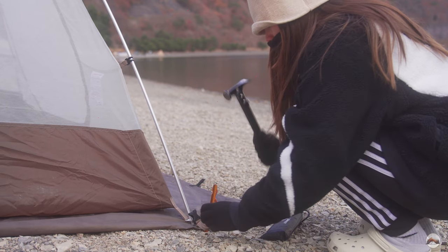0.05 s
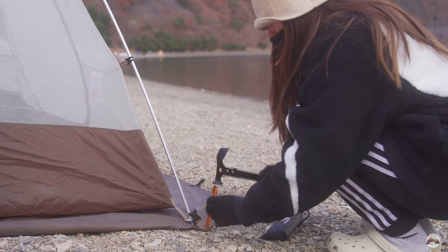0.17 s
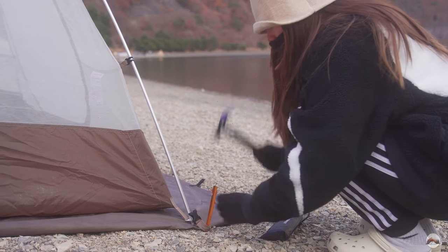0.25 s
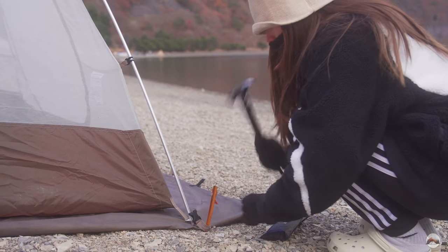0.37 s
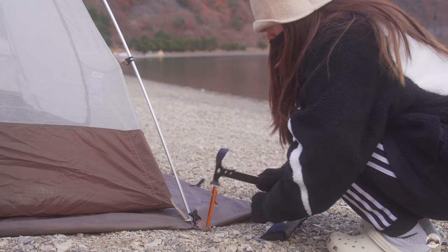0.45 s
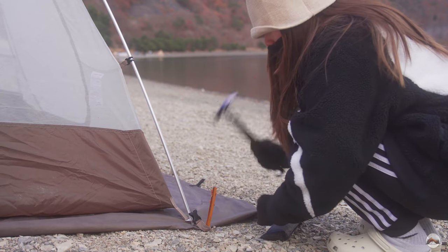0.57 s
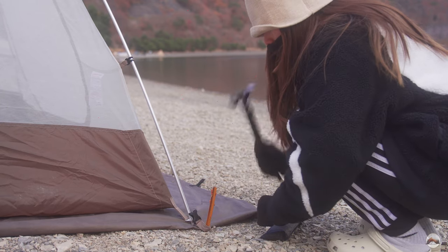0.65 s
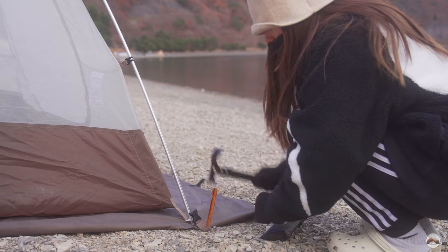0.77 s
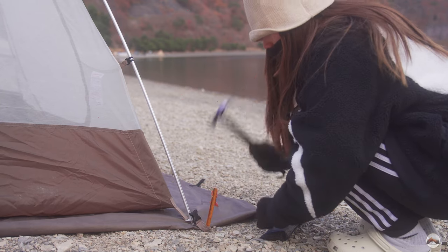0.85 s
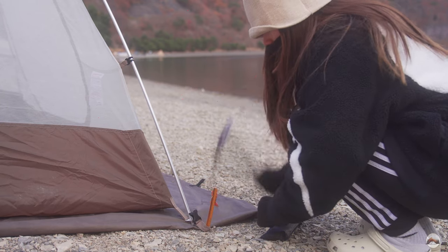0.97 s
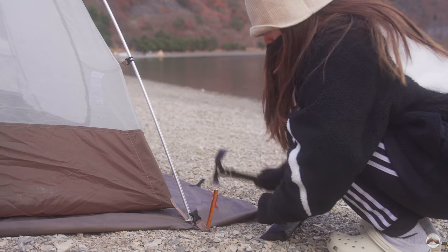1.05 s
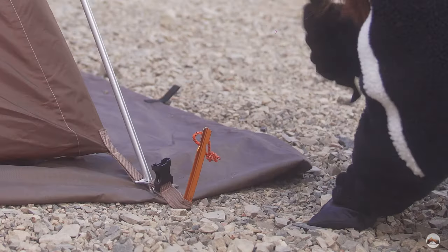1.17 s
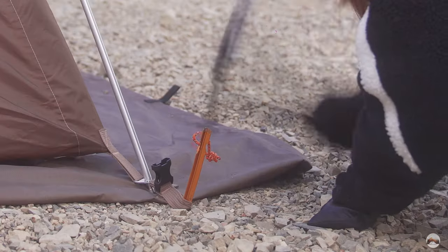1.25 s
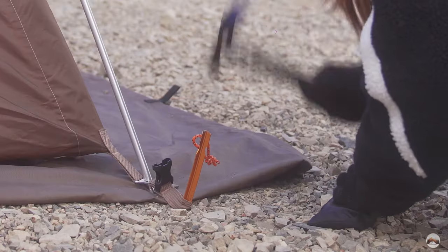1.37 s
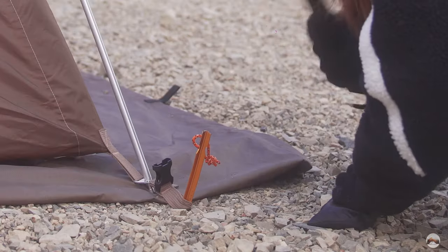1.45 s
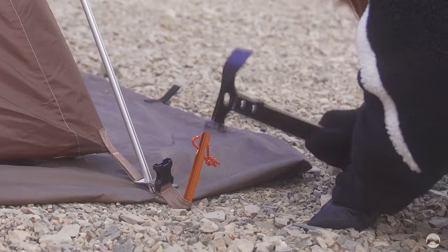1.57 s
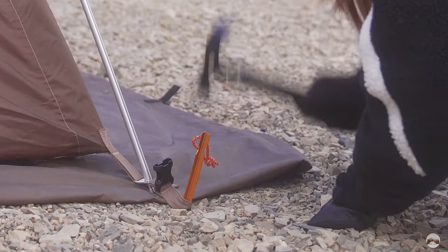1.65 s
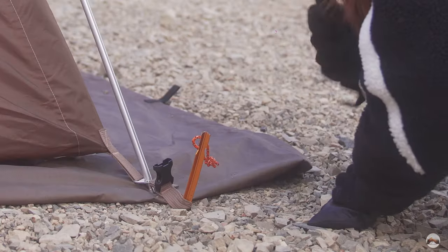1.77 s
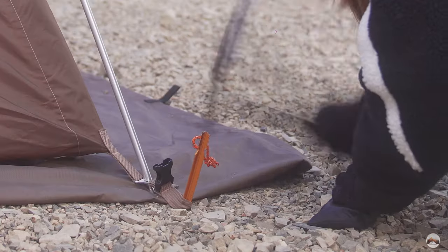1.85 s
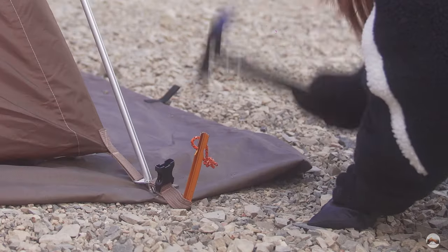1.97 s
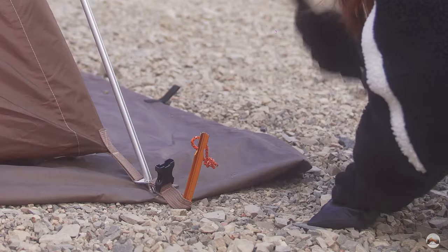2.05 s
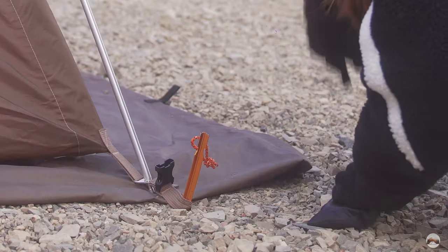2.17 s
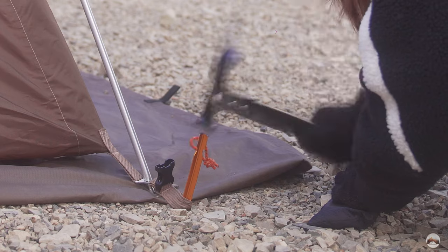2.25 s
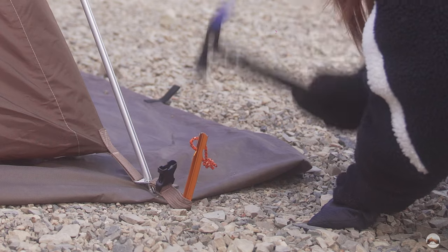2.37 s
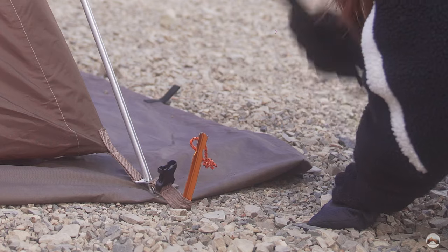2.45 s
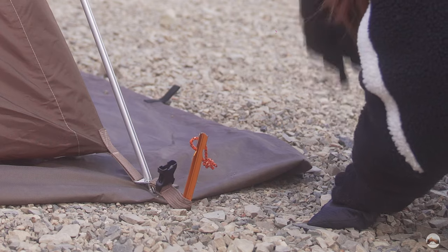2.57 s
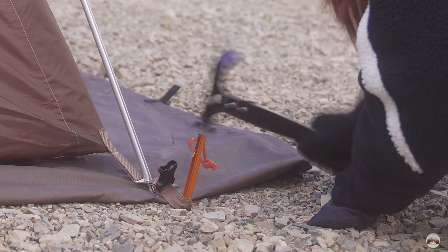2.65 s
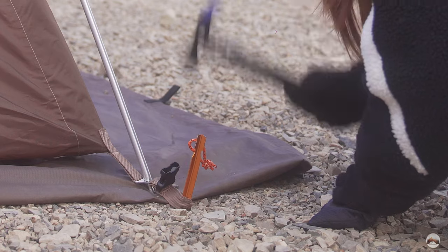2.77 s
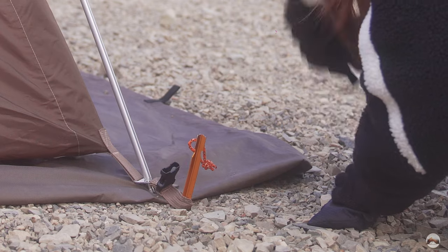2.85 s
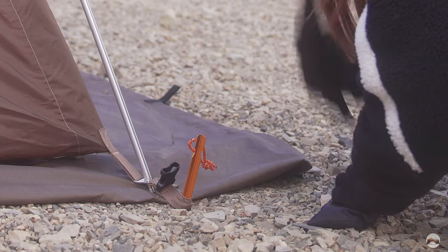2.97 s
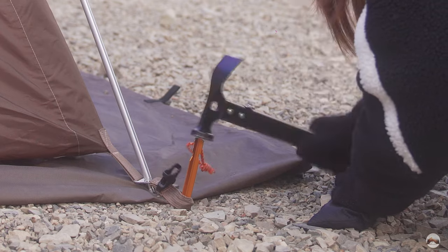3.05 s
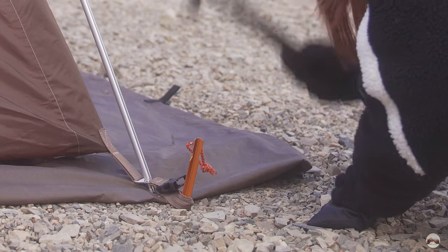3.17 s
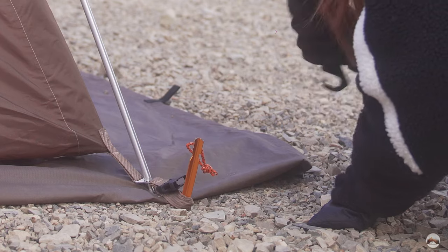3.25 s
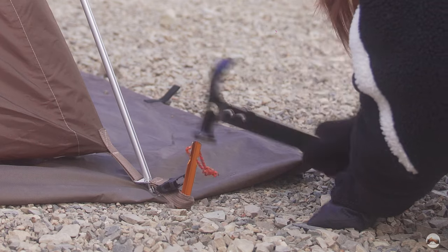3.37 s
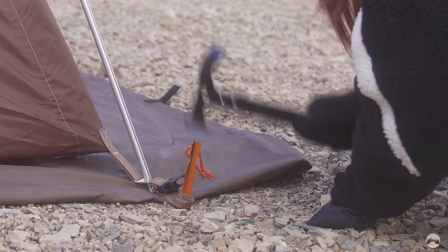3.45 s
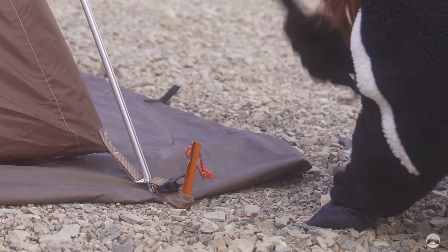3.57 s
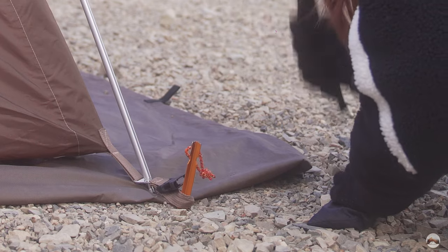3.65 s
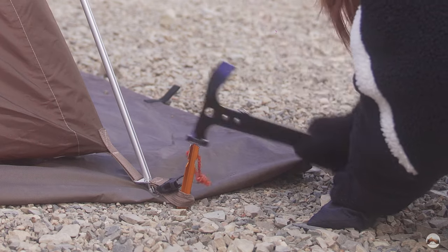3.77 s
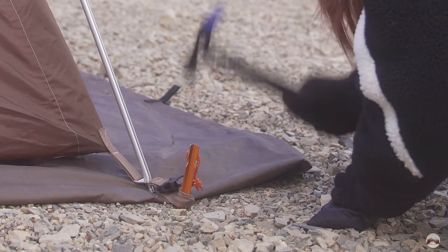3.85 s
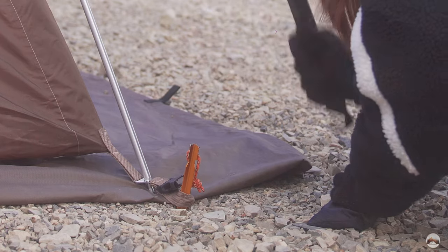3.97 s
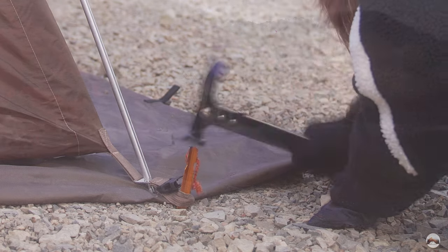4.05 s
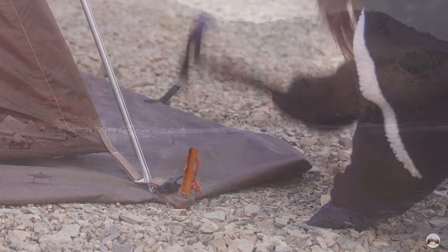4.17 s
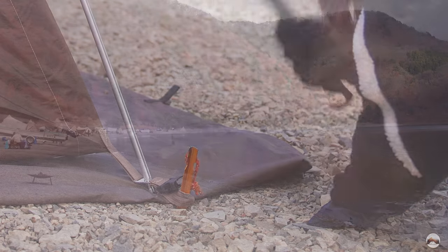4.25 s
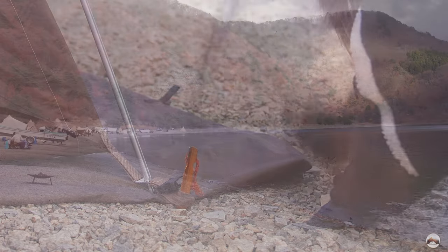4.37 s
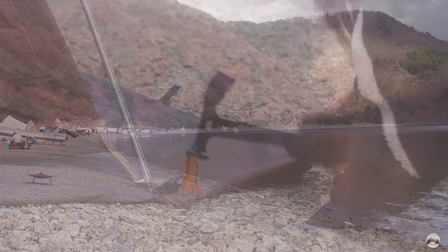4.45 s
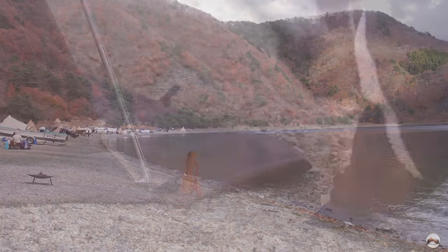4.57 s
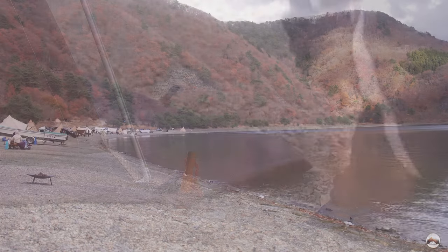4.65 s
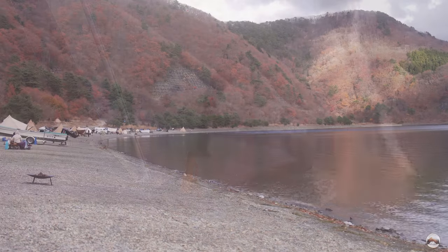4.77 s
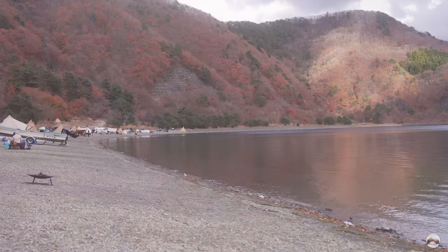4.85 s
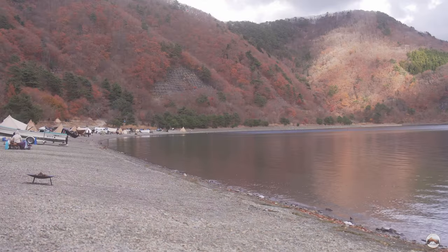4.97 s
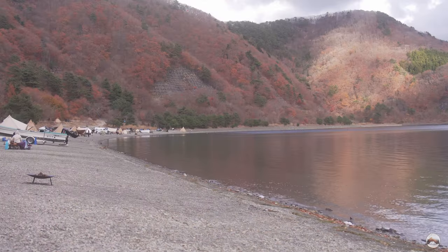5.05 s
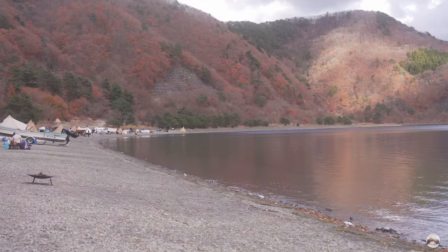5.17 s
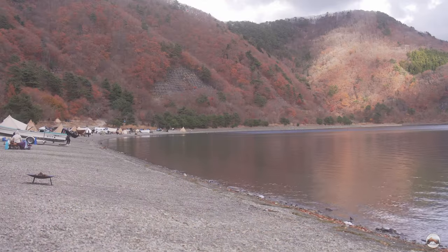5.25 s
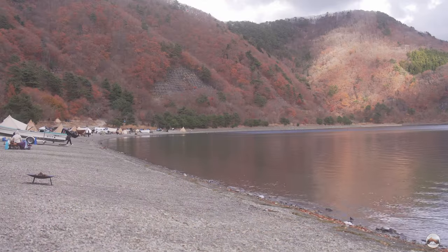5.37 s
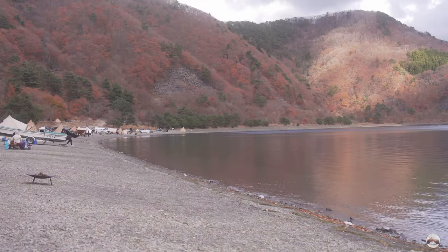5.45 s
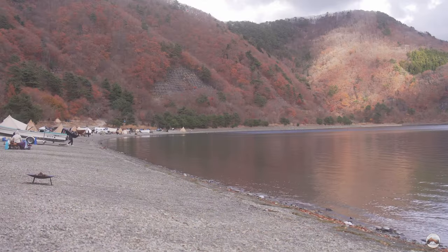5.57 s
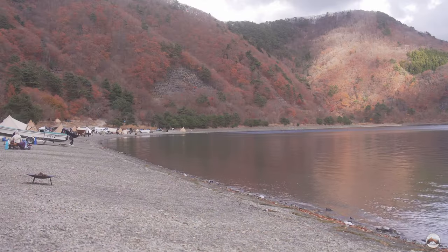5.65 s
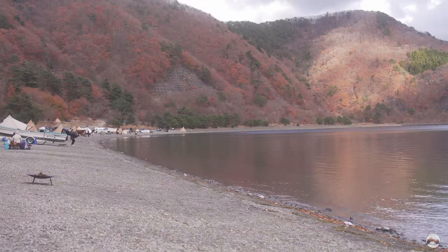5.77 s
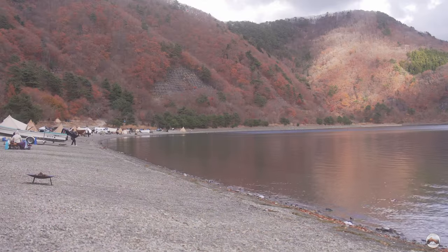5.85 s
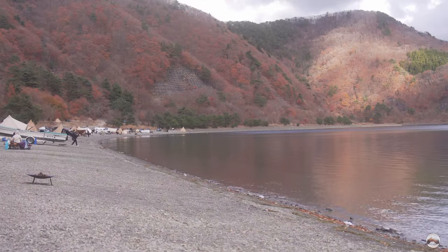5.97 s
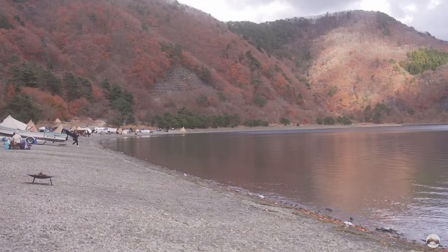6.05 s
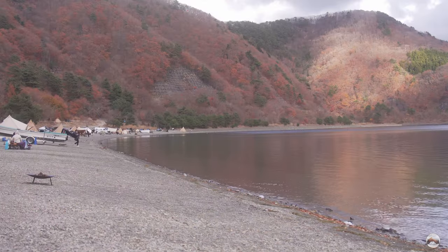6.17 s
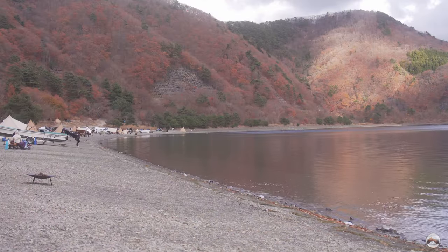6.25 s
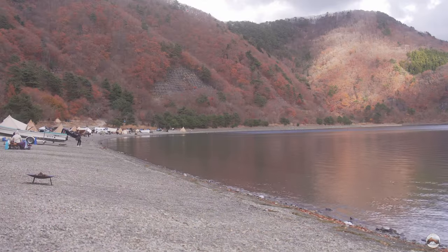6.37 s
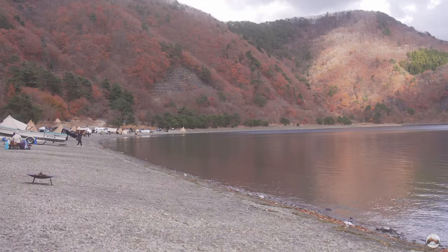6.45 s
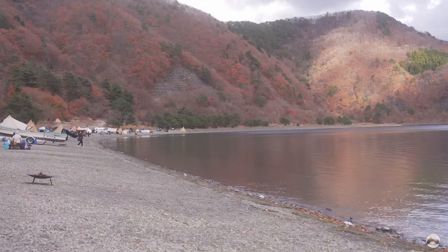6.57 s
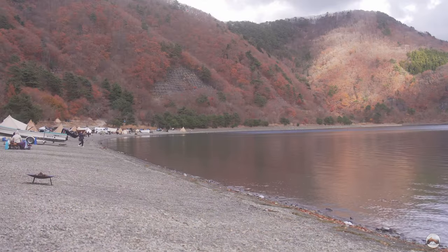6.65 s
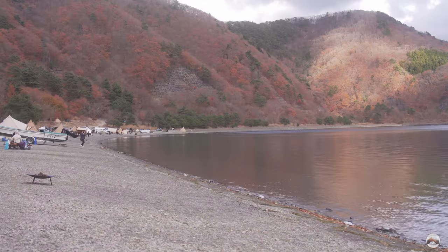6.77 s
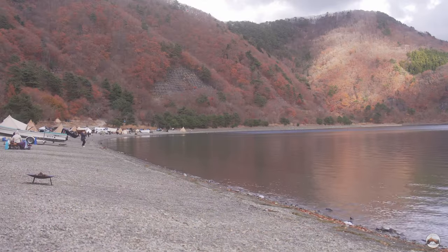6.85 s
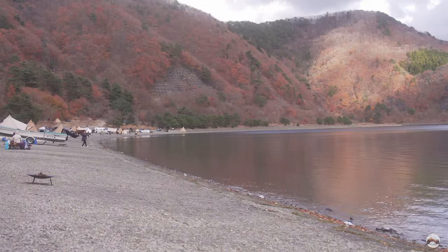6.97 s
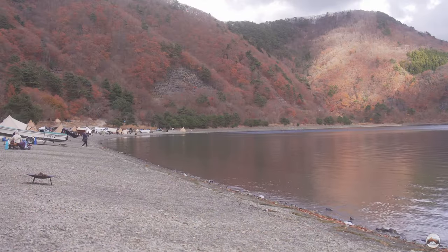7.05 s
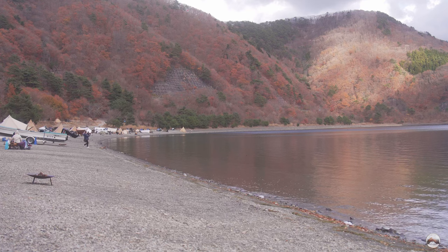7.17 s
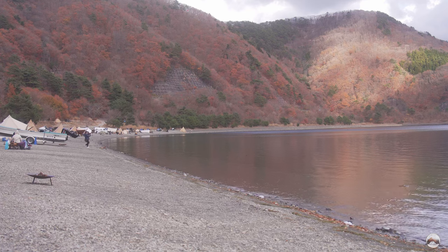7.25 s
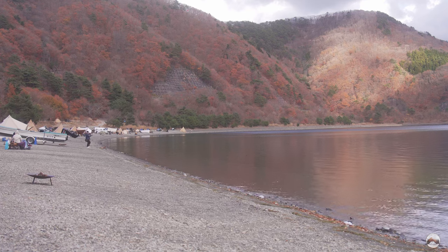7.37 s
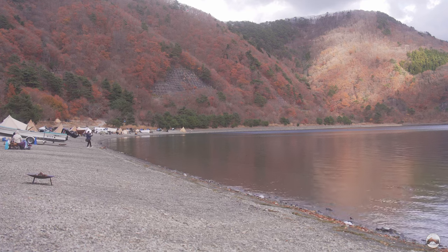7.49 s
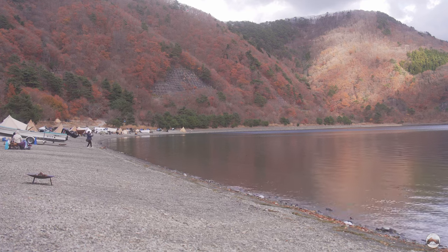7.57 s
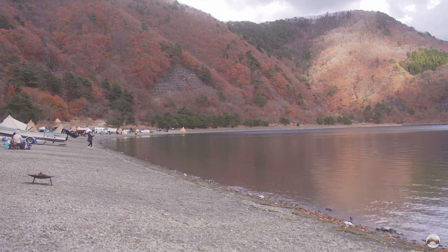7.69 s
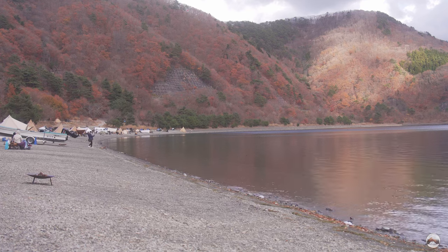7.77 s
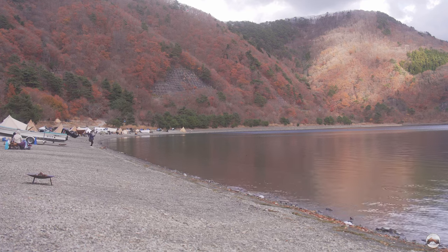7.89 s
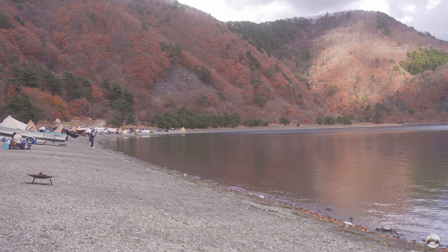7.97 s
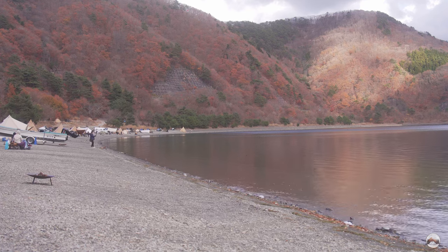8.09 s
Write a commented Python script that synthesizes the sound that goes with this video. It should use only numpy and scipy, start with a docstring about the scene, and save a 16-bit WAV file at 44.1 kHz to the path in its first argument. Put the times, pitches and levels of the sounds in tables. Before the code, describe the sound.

Close to the microphone, a small steel hammer drives a metal tent peg into gravel at about three blows a second, without pause. Each blow is a sharp bright clink, a short knock and stony crunch, then a tiny rebound tap and a thin high ring. Very quiet open lakeside air lies behind, with a faint far crow early, fabric rustle and pebble ticks midway.

```python
"""Lakeside gravel: a small steel hammer drives an alloy tent peg, about three blows a second.
Blows and bounces: shaped noise (crack, crunch), struck modes (clink, thud), peg and hammer notes.
Nearby surfaces answer with band-limited delays, the far shore with a tail of noise.
Behind: noise beds (open air, gusts of fabric rustle), pebble ticks, a far crow of gliding overtones,
far metal clinks of struck modes and a brief soft sine tone."""
import sys
import numpy as np
from scipy import signal
from scipy.fft import rfft, irfft, next_fast_len
from scipy.io import wavfile
from scipy.ndimage import uniform_filter1d

SR = 44100
rng = np.random.default_rng(int(sys.argv[2]) if len(sys.argv) > 2 else 0)


def magnitude_from_level(level_db):
    """Linear magnitude for a level in decibels (20 dB per decade)."""
    exponent = np.asarray(level_db, float) / 20
    return 10 ** exponent


def to_wav(sig):
    """Store sig (one row per channel, or 1-D mono) as 16-bit WAV at the path in sys.argv[1].

    Samples outside -1..1 are clipped; the rate is SR.
    """
    pcm = np.clip(np.atleast_2d(sig), -1, 1) * 32767
    pcm = np.round(pcm).astype(np.int16)
    wavfile.write(sys.argv[1], SR, pcm.T)  # frames by channels


N = 358091

# hammer blows: start_s, lower_clink_db, upper_clink_db, peg_note_db, hammer_note_db
BLOWS = [(-0.068, -10, -6, -15, -37.5), (0.2046, -6, -7, -24, -41.5), (0.5111, -5.5, -8, -18, -40.5),
         (0.7887, -4.5, -13, -16.5, -30.5), (1.0706, -2, -16, -16.5, -36), (1.3469, -5.5, -9.5, -20, -26),
         (1.6439, -9.5, -2, -8.5, -49.5), (1.947, -11.5, -6.5, -14.5, -30.5), (2.3379, -16, -5.5, -18, -32),
         (2.7351, -16, -3.5, -17.5, -46), (3.1063, -8.5, -5.5, -21.5, -29), (3.4503, -5, 0, -12, -26.5),
         (3.8084, -10, -9.5, -34, -39.5), (4.1373, -9, -10, -35, -36), (4.4744, -10, -0.5, -16, -25.5),
         (4.8218, -10.5, -4.5, -27.5, -32), (5.1655, -4, -2, -23.5, -28), (5.5112, -4.5, -2, -9.5, -29),
         (5.8462, -7, -3, -6, -26.5), (6.1679, -20, -3.5, -7, -23.5), (6.49, -17, -6, -11, -33.5),
         (6.8787, -7.5, -4.5, -4, -21), (7.2165, -10, -8.5, -15, -22.5), (7.536, -10.5, -14, -13.5, -27.5),
         (7.857, -14, -9, -15, -19.5)]
# head bouncing on the peg: start_s, clink_db, thud_db, next_touch_s (3 ms or less: none), note_left_db
BOUNCES = [(0.2358, -33.5, -22.5, 0, -46), (0.5519, -33.5, -24, 0.00029, -46),
           (0.817, -26, -25.5, 0.0066, -48.5), (1.1008, -28.5, -18.5, 0, -41),
           (1.3641, -21.5, -19.5, .0135, -49.5), (1.6703, -19, -21, 0.0081, -47),
           (1.9725, -21, -25.5, .0076, -60.5), (2.3699, -20, -25.5, .0071, -58),
           (2.7617, -18, -26.5, .0083, -66), (3.135, -25.5, -23.5, .0102, -46),
           (3.471, -21.5, -20, .0079, -61.5), (3.8347, -27.5, -23, .0099, -53),
           (4.158, -23, -19.5, .01, -56.5), (4.496, -25, -21.5, 0.0052, -50.5),
           (4.8415, -20, -19.5, 0.011, -45.5), (5.1829, -20.5, -18, 0, -39),
           (5.5367, -20, -19.5, .0103, -46.5), (5.8657, -22.5, -21, .0092, -57),
           (6.191, -26, -19, .0157, -36.5), (6.51, -21, -17.5, .0085, -43),
           (6.9066, -22.5, -17.5, .0092, -36), (7.2479, -25, -19, 0.0072, -37.5),
           (7.5656, -20, -17, .0105, -48.5), (7.8781, -29.5, -17, .0094, -49.5)]
# ground taking the blows as the peg sinks: time_s, deep_thump_db, knock_db, shank_note_db
GROUND = [(0.199, -30.5, -11.5, -27), (.8, -27, -11.5, -26.5), (1.35, -38, -14.5, -25.5),
          (1.65, -27, -14.5, -13), (2.0, -24.5, -13.5, -14), (2.4, -16, -16, -21),
          (3.1, -17.5, -18.5, -24.5), (3.5, -23, -18.5, -30), (3.902, -18, -20.5, -21),
          (4.499, -31.5, -17, -22), (5.198, -19.5, -19, -18.5), (6.2, -15.5, -19, -19),
          (6.5, -17.5, -22.5, -17), (7.859, -16.5, -16, -19)]
# modes of the struck metal: pitch_hz, level_db, t60_s
CLINK_MODES = [(3960, -15, 0.032), (4800, -11, 0.0067), (5070, -3.5, 0.013), (5240, -3, 0.039),
               (6190, -19.5, 0.06), (6980, 0, 0.015), (7663, -4, 0.021), (7930, 1.5, 0.01),
               (8450, 4, 0.018), (8480, -3, 0.014), (9512, -13, .06), (10850, -7, 0.013), (12100, -4, 0.01),
               (13400, -22.5, 0.031), (15300, -23, .01)]
# modes of ground and shank: pitch_hz, level_db, t60_s
THUD_MODES = [(165, -13, 0.062), (225.7, -2.5, 0.013), (353, 4, 0.018), (516, 4, 0.013), (644, -0.5, .022),
              (887, -0.5, 0.015), (1282, 2, 0.011), (1960, -5, .024), (2237, 5, 0.0084)]
# relative noise spectrum of metal on metal: freq_hz, density_db_per_hz
CRACK_SPECTRUM = [(1500, -21.5), (3000, -2.5), (5000, -3), (8000, 6), (10500, -11), (16000, -14.5),
                  (20000, -27)]
# relative noise spectrum of stones under a blow: freq_hz, density_db_per_hz
CRUNCH_SPECTRUM = [(100, -13), (200, 10), (1000, 0.5), (1600, -5.5), (3000, -1), (8000, -28),
                   (11000, -28.5), (16000, -24)]
# relative noise spectrum of stone on stone: freq_hz, density_db_per_hz
TICK_SPECTRUM = [(800, -11), (2500, 1.5), (4200, 1.5), (8000, 0), (11000, -8.5), (16000, -12)]
# near surfaces answering: delay_s, level_db, centre_hz, width_hz
ECHOES = [(0.013, -29.5, 6590, 4820), (0.049, -34, 6340, 4940)]
# pebbles shifting, and at 0.33 s a late return of the blow before it: start_s, level_db, low_part_db (re
# level_db)
PEBBLES = [(0.0832, -47, -5), (0.3267, -42.5, -20), (3.5191, -32.5, -32), (4.8867, -29.5, -10),
           (4.9169, -27, -12), (4.9545, -29, -6), (5.9511, -50, -6), (6.5465, -46, -9), (6.5877, -42, -13),
           (6.6012, -43.5, -20), (6.6846, -47, 11.5), (6.7244, -55, -4.5), (6.7578, -52, 11.5),
           (7.7697, -45.5, -11)]
# far crow: start_s, length_s, top_pitch_hz, level_db
CAWS = [(.05, .27, 434, -61), (.595, .235, 432, -60)]
# crow overtones: multiple, level_db
CAW_OVERTONES = [(1, -10), (2, -2), (3, 0), (4, -14)]
# brief soft tone: time_s, pitch_hz, level_db
SOFT_TONE = [(4.70, 545, -65), (4.73, 533, -47.5), (4.78, 540, -51), (4.81, 535, -76)]
# far metal, larger and smaller piece: strikes (start_s, level_db), modes (pitch_hz, level_db, t60_s)
FAR_CLINKS = [([(2.278, -60)], [(1437, -4, .3), (2110, -2, .2), (2702, 0, .3), (2982, -3, .2),
              (3600, -8, .2), (3750, -5, .3), (4600, -19, .3)]), ([(2.092, -66), (1.53, -65)],
              [(2900, 0, .12), (4350, -13, .25)])]
# gusts of fabric rustle: time_s, level_db
GUSTS = [(0, -67.5), (.45, -68.5), (.7, -75), (1.3, -74), (1.8, -77), (2.7, -80), (3.4, -74), (4.35, -77),
         (4.66, -55), (5.05, -55), (5.4, -61.5), (5.62, -62), (5.93, -75), (6.05, -70), (6.12, -59),
         (6.44, -62), (6.62, -75.5), (7.2, -77), (7.75, -70.5), (8.05, -62.5)]
# relative noise spectrum of the fabric: freq_hz, density_db_per_hz
RUSTLE_SPECTRUM = [(1500, -6.5), (2500, -3.5), (3000, -2), (4500, -3), (6000, -6), (7000, -2), (8500, -2),
                   (10500, -15.5), (16000, -11.5)]
# open air: time_s, middle_db, low_db
AIR_LEVELS = [(0.0, -59.5, -59), (1.13, -68, -60.5), (1.45, -67, -57), (2.78, -68.5, -59.5),
              (4.16, -65, -54), (4.95, -53, -54), (5.31, -60.5, -54), (5.81, -63, -57.5), (7.26, -64, -58),
              (8.12, -59, -56)]
# relative noise spectrum of the middle air: freq_hz, density_db_per_hz
MIDDLE_AIR_SPECTRUM = [(400, -12.5), (700, -1.5), (950, 1), (1500, -5.5), (2400, -13.5), (4000, -21)]
# relative noise spectrum of the low air: freq_hz, density_db_per_hz
LOW_AIR_SPECTRUM = [(25, -22.5), (80, -12.5), (150, -5), (215, -4), (250, 2.5), (290, -6), (450, -8),
                    (700, -24)]

LOW_CUT_HZ = 124   # low cut of the hammering, as from a recorder's high-pass
PEG_HZ, PEG_T60_S = 3215, 0.03
HAMMER_HZ, HAMMER_T60_S = 2577, 0.32
# close second mode: the long note holds, then dips
BEAT_PER_S, TWIN_DB, TWIN_LAG_RAD = 3.6, -2.5, 0.75
# each further touch comes sooner and weaker; before the second touch, the long note has a common level
GAP_SHRINK, TOUCH_CLINK_LOSS_DB, TOUCH_THUD_LOSS_DB, BOUNCING_NOTE_DB = 0.58, 10, 7.5, -33
SHORE_HZ, SHORE_HALF_WIDTH_HZ, SHORE_T60_S, SHORE_DB = 2080, 400, 0.4, -65
# rise as a share of the length, pitch shortfalls as shares of the top pitch, fade
CAW_RISE, CAW_START_DROP, CAW_END_DROP, CAW_EDGE_S = 0.22, 0.13, 0.2, 0.025
CRUNCH_T60_S = 0.05
THUD_SPREAD_DB, CLINK_SPREAD_DB = 1.5, 2   # chance from blow to blow, from touch to touch
GRAIN_DB, GRAINS_PER_S, LOW_AIR_FLUTTER_DB = 4.5, 400, 1.5


def rms_one(x):
    """Scale to rms 1."""
    return x / np.sqrt(np.mean(x ** 2) + 1e-20)


def in_time(rows):
    """Columns of a curve, one value a sample."""
    time_s, *columns = np.transpose(rows)
    return [np.interp(np.arange(N) / SR, time_s, column) for column in columns]


def coloured(x, spectrum):
    """Shape by a spectrum in dB per Hz; white rms 1 stays about rms 1."""
    hz, db = np.transpose(spectrum)
    size = next_fast_len(len(x))
    grid_hz = np.maximum(np.fft.rfftfreq(size, 1 / SR), 1)
    gain = magnitude_from_level(np.interp(np.log(grid_hz), np.log(hz), db, left=-80, right=-80))
    gain = gain / np.sqrt(np.mean(gain ** 2))
    return irfft(rfft(x, size) * gain, size)[:len(x)]


def white():
    """White noise of rms 1."""
    return rng.standard_normal(N)


def band_passed(x, edges_hz, order):
    """Butterworth band-pass."""
    return signal.sosfilt(signal.butter(order, edges_hz, "band", fs=SR, output="sos"), x)


def high_passed(x, cut_hz, order):
    """Butterworth high-pass."""
    return signal.sosfilt(signal.butter(order, cut_hz, "high", fs=SR, output="sos"), x)


def drift(knots_per_s):
    """Random line through knots of spread 1."""
    knots = rng.standard_normal(int(N / SR * 60) + 2)
    place = np.arange(N) / SR * np.clip(knots_per_s, 0.1, 59)
    return np.interp(place, np.arange(len(knots)), knots)


def clicks(start_s, gain):
    """Train of single samples; starts before 0 are left out."""
    out, heard = np.zeros(N), start_s >= 0
    out[(start_s[heard] * SR).astype(int)] = gain[heard]
    return out + 1e-18


def dying(train, t60_s):
    """Envelope that jumps at each click and falls by 60 dB in t60_s."""
    return signal.lfilter([1], [1, -magnitude_from_level(-60 / (t60_s * SR))], train)


def ring(train, hz, t60_s):
    """Two-pole resonator: a unit click starts a dying sine of height 1."""
    r, w = magnitude_from_level(-60 / (t60_s * SR)), 2 * np.pi * hz / SR
    return signal.lfilter([0, np.sin(w)], [1, -2 * r * np.cos(w), r * r], train)


def struck(start_s, db, modes, spread_db):
    """Each touch excites each mode with random strength and sign; db: one column, or one per mode."""
    shape = (len(start_s), len(modes))
    luck = rng.standard_normal(shape + (2,))
    db = np.broadcast_to(np.reshape(db, (len(start_s), -1)), shape)
    out = np.zeros(N)
    for k, (hz, mode_db, t60_s) in enumerate(modes):
        strength = magnitude_from_level(db[:, k] + mode_db + spread_db * luck[:, k, 0])
        out += ring(clicks(start_s, strength * np.sign(luck[:, k, 1])), hz, t60_s)
    return out


def open_air():
    """Two noise beds, middle and low, that swell on their own."""
    middle_db, low_db = in_time(AIR_LEVELS)
    middle = coloured(white(), MIDDLE_AIR_SPECTRUM) * magnitude_from_level(middle_db + drift(4.7))
    low = coloured(white(), LOW_AIR_SPECTRUM) * magnitude_from_level(low_db + LOW_AIR_FLUTTER_DB * drift(10))
    return middle + low


def fabric_rustle():
    """Grainy noise in gusts, flickering band by band."""
    grain_gain = 0.5 * magnitude_from_level(GRAIN_DB * np.minimum(rng.exponential(1, N), 4))
    grains = 1 + grain_gain * (rng.random(N) < GRAINS_PER_S / SR)
    # two independent noises in turn, so neighbouring bands do not cancel
    noises = [coloured(white() * grains, RUSTLE_SPECTRUM) for _ in range(2)]
    edges_hz = np.geomspace(1400, 17000, num=7)
    patches = np.zeros(N)
    for k in range(len(edges_hz) - 1):
        patches += band_passed(noises[k % 2], edges_hz[k:k + 2], 1) * magnitude_from_level(2.0 * drift(5))
    gust_db, = in_time(GUSTS)
    return rms_one(patches) * magnitude_from_level(gust_db + drift(40))


def far_metal():
    """Struck modes; distance smears each strike over a few scattered arrivals."""
    late_s = np.r_[0, rng.uniform(0.006, 0.045, 5)]
    out = np.zeros(N)
    for strikes, modes in FAR_CLINKS:
        for start_s, db in strikes:
            out += struck(start_s + late_s, db - 7 * (late_s > 0), modes, spread_db=1.5)
    return out


def crow():
    """Overtone stacks on an arched, slightly unsteady pitch."""
    out, t = np.zeros(N), np.arange(N) / SR
    for start_s, length_s, top_hz, db in CAWS:
        u = np.clip((t - start_s) / length_s, 0, 1)
        rise_sag = CAW_START_DROP * (1 - u / CAW_RISE) ** 2
        fall_sag = CAW_END_DROP * ((u - CAW_RISE) / (1 - CAW_RISE)) ** 2
        sag = np.where(u < CAW_RISE, rise_sag, fall_sag)
        pitch_hz = top_hz * (1 - sag) * (1 + 0.0034 * drift(40))
        phase = 2 * np.pi * np.cumsum(pitch_hz) / SR
        stack = sum(magnitude_from_level(o_db + 1.5 * drift(30)) * np.sin(k * phase) for k, o_db in CAW_OVERTONES)
        fade = np.clip(np.minimum(u, 1 - u) * length_s / CAW_EDGE_S, 0, 1)
        out += magnitude_from_level(db) * fade * stack
    return out


def soft_tone():
    """One brief gliding sine."""
    t = np.arange(N) / SR
    hz, db = in_time(SOFT_TONE)
    on = (t > SOFT_TONE[0][0]) & (t < SOFT_TONE[-1][0])
    return magnitude_from_level(db) * on * np.sin(2 * np.pi * np.cumsum(hz) / SR)


def pebbles():
    """Dry noise tick with a duller modal knock under it."""
    start_s, db, low_db = np.transpose(PEBBLES)
    tick = coloured(white(), TICK_SPECTRUM) * dying(clicks(start_s, magnitude_from_level(db - 5)), 0.007)
    return tick + struck(start_s, db + low_db - 7, THUD_MODES[4:7], spread_db=2)


def far_shore():
    """Scattered far return of each blow: a late, narrow-band noise tail."""
    blow_s = np.array(BLOWS)[:, 0]
    band = [(SHORE_HZ - SHORE_HALF_WIDTH_HZ, -30), (SHORE_HZ, 0), (SHORE_HZ + SHORE_HALF_WIDTH_HZ, -30)]
    gain = magnitude_from_level(SHORE_DB + 2.7 * rng.standard_normal(len(blow_s)))
    return coloured(white(), band) * dying(clicks(blow_s + 0.033, gain), SHORE_T60_S)


def touches():
    """Bounces plus two quicker touches where the gap allows: start_s, clink_db, thud_db, note_db."""
    s, clink_db, thud_db, gap_s, left_db = np.transpose(BOUNCES)
    again = gap_s > 0.003
    rows = [np.c_[s, clink_db, thud_db, np.where(again, BOUNCING_NOTE_DB, left_db)]]
    for k, gaps in [(1, 1), (2, 1 + GAP_SHRINK)]:
        weaker_clink_db = clink_db - k * TOUCH_CLINK_LOSS_DB
        weaker_thud_db = thud_db - k * TOUCH_THUD_LOSS_DB
        rows.append(np.c_[s + gaps * gap_s, weaker_clink_db, weaker_thud_db, left_db][again])
    return np.vstack(rows)


def ground():
    """Thud modes of ground and shank, and the noisy crunch of stones."""
    blow_s, bounces = np.array(BLOWS)[:, 0], touches()
    at_s, *parts = np.transpose(GROUND)
    blow_db = np.transpose([np.interp(blow_s, at_s, part) for part in parts])
    blow_db = blow_db + THUD_SPREAD_DB * rng.standard_normal(blow_db.shape)
    bounce_db = bounces[:, 2:3] + [-14, -1.5, -12]
    s = np.r_[blow_s, bounces[:, 0]]
    parts_db = np.r_[blow_db, bounce_db]
    # modes by pitch: deep thump, knock, shank note
    group = np.searchsorted([260, 1600], np.array(THUD_MODES)[:, 0])
    mode_db = parts_db[:, group] + np.array([4, -5, 3])[group]
    thud = struck(s + 0.0008, mode_db, THUD_MODES, spread_db=2.0)
    grit = magnitude_from_level(4.5 * drift(58))
    crunch_level = dying(clicks(s + 0.0011, magnitude_from_level(parts_db[:, 1] - 10.5)), CRUNCH_T60_S)
    return thud + coloured(white(), CRUNCH_SPECTRUM) * crunch_level * grit


def hammer_note(s, db):
    """The head's long note; each new touch damps what rang and leaves a new level."""
    order = np.argsort(s)
    t = np.arange(N) / SR
    last = order[np.searchsorted(s[order], t, side="right") - 1]
    fall_db = 60 * (t - s[last]) / HAMMER_T60_S
    blow_s = np.array(BLOWS)[:, 0]
    since_blow_s = t - blow_s[np.searchsorted(blow_s, t) - 1]
    # 40-sample smoothing of the steps
    level = uniform_filter1d(magnitude_from_level(db[last] - fall_db), size=40)
    phase = uniform_filter1d(rng.uniform(0, 2 * np.pi, len(s))[last], size=40)
    twin_cycles = HAMMER_HZ * t + BEAT_PER_S * since_blow_s
    twin = magnitude_from_level(TWIN_DB) * np.sin(2 * np.pi * twin_cycles + phase - TWIN_LAG_RAD)
    return level * (np.sin(2 * np.pi * HAMMER_HZ * t + phase) + twin)


def metal():
    """Contact noise, clink modes, peg note and hammer note of blows and bounces."""
    blows, bounces = np.array(BLOWS), touches()
    s = np.r_[blows[:, 0], bounces[:, 0]]
    lower_db = np.r_[blows[:, 1], bounces[:, 1] - 5]
    upper_db = np.r_[blows[:, 2], bounces[:, 1] - 1.5]
    peg_db = np.r_[blows[:, 3], bounces[:, 1] - 8]   # a bounce wakes the peg note with its clink
    note_db = np.r_[blows[:, 4], bounces[:, 3]]

    is_upper = np.array(CLINK_MODES)[:, 0] > 6400
    mode_db = np.where(is_upper, upper_db[:, None] - 8.5, lower_db[:, None] - 7.0)
    clink = struck(s + 0.0006, mode_db, CLINK_MODES, spread_db=CLINK_SPREAD_DB)

    rise = np.ones(14) / 14   # the faces take a third of a millisecond to meet
    noise = coloured(white(), CRACK_SPECTRUM)
    dull = signal.sosfiltfilt(signal.butter(3, 6400, fs=SR, output="sos"), noise)
    crack = np.zeros(N)
    for part, db in [(dull, lower_db + 6), (noise - dull, upper_db - 1.5)]:
        fall = dying(clicks(s + 0.00054, magnitude_from_level(db)), 0.0092)
        crack += part * signal.lfilter(rise, [1], fall)

    peg = ring(clicks(s + 0.00055, magnitude_from_level(peg_db)), PEG_HZ, PEG_T60_S)
    return crack + clink + peg + hammer_note(s + 0.00017, note_db)


def echoes(x):
    """Short, band-limited returns from things standing near."""
    out = np.zeros(N)
    for delay_s, db, hz, width_hz in ECHOES:
        lag = int(delay_s * SR)
        edges_hz = np.clip([hz - width_hz / 2, hz + width_hz / 2], 100, 0.45 * SR)
        out[lag:] += magnitude_from_level(db) * band_passed(x, edges_hz, 2)[:-lag]
    return out


def scene():
    """Near hammering with its echoes over the open-air background."""
    background = open_air() + fabric_rustle() + far_metal() + crow() + soft_tone() + pebbles()
    hammering = high_passed(far_shore() + ground() + metal(), LOW_CUT_HZ, 6)
    return (background + hammering + echoes(hammering))[None]


def roll_off(x):
    """The treble ends steeply here."""
    return signal.sosfilt(signal.butter(12, 16190, fs=SR, output="sos"), x)


def record(dry):
    """Tanh squashes peaks towards 5.2 times full scale; an 18 Hz high-pass cuts rumble."""
    top = 5.2
    squashed = top * np.tanh(dry / top)
    mix = high_passed(squashed, 18, 1)
    return roll_off(mix)


dry = scene()
out = record(dry)
to_wav(out)
```